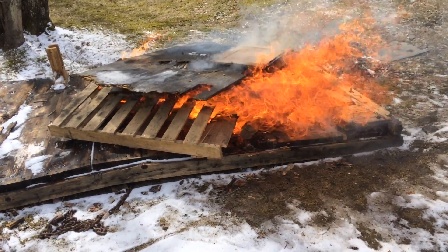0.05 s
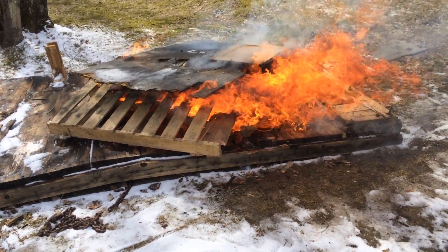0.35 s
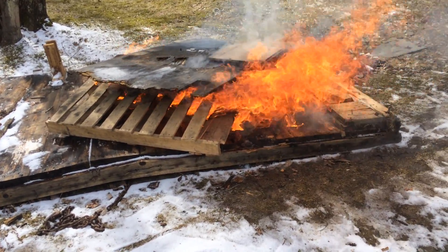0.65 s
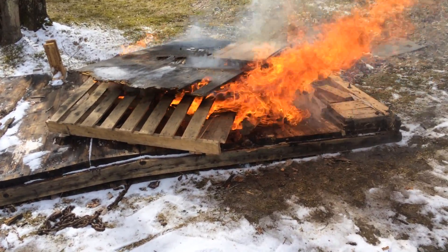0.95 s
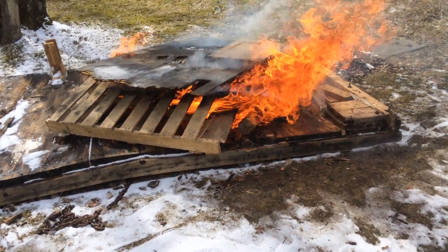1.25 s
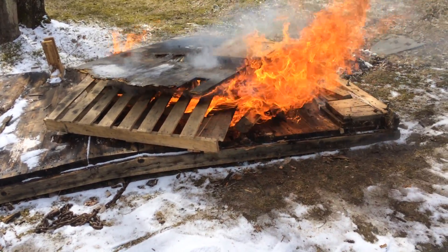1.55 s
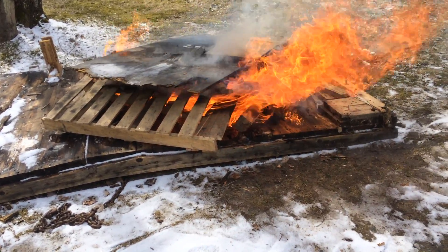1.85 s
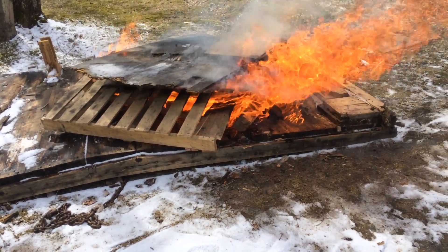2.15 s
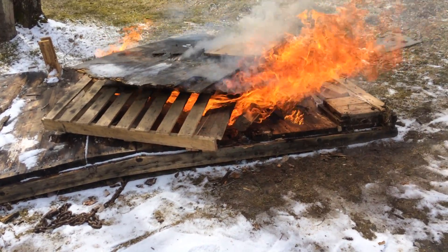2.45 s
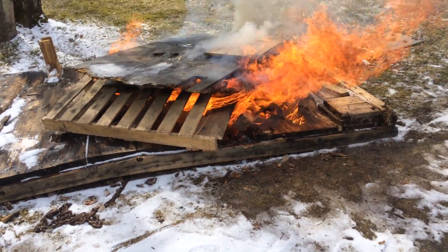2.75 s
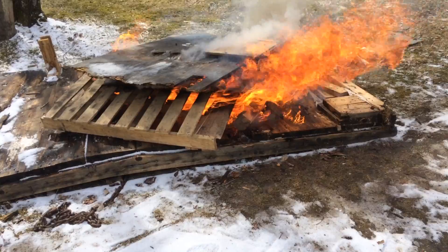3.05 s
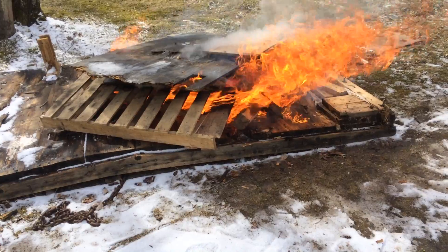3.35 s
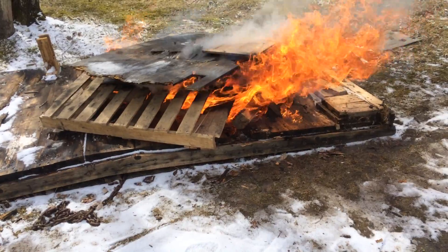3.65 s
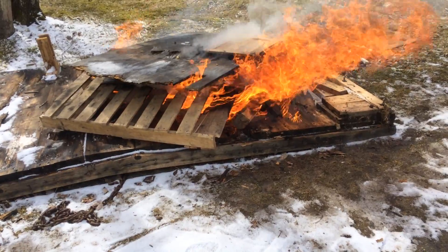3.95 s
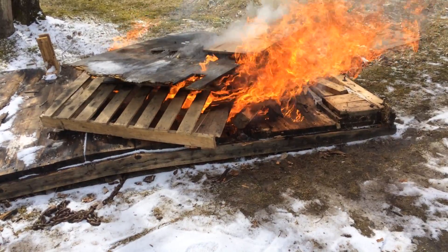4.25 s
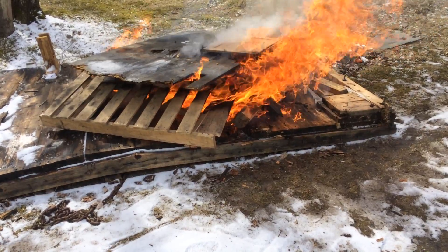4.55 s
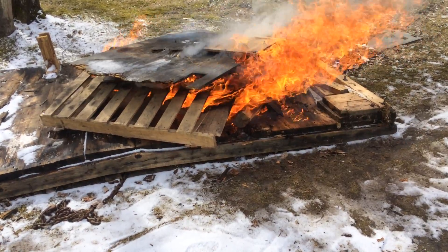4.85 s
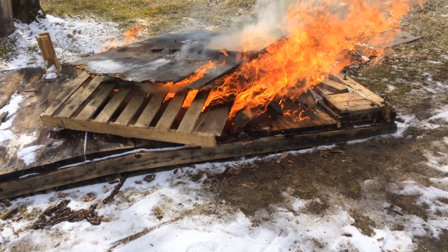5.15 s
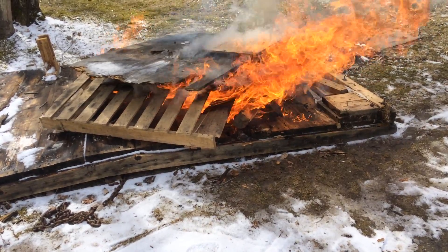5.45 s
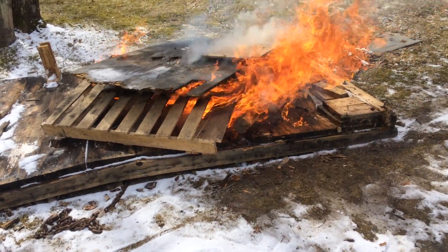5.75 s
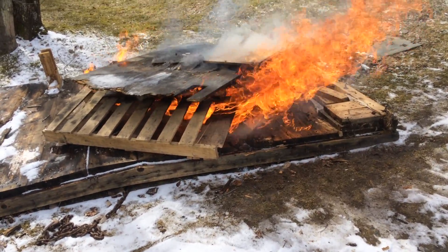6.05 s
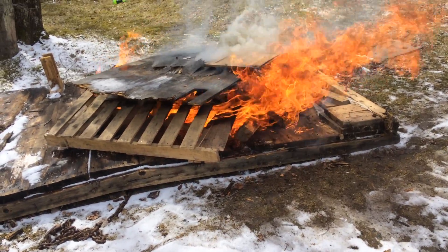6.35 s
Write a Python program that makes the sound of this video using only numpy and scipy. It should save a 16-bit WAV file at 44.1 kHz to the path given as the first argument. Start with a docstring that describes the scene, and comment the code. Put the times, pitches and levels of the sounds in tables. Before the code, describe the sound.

Dry wood crackles and pops throughout in a nearby open-air fire, some cracks loud and bright, others small and hollow, each dying away quickly. A faint, fluttering flame roar and a low rumble of wind on the microphone lie beneath, along with a thin hiss of boiling sap. A thumping pop stands out about a third of the way through, and a weaker one follows later as the crackling carries on.

```python
"""Flames flutter low in a light wind, and at once wood snaps: a pile of pallets and boards burns outdoors,
a few steps from a small microphone. Steam pockets split the wood in brittle fractures that scatter
among the boards and fade over the yard; a few burst with a thump. In between, embers tick,
boiling sap sizzles, and now and then a sheet of flame catches with a soft whump."""
import sys
import numpy as np
from scipy import signal
from scipy.fft import rfft, irfft, next_fast_len
from scipy.io import wavfile
from scipy.ndimage import map_coordinates

SR = 44100
rng = np.random.default_rng(int(sys.argv[2]) if len(sys.argv) > 2 else 0)


def unload_wav(signal):
    """Save mono or channel-first audio to the path in sys.argv[1] as 16-bit WAV at rate SR, clipped to [-1, 1]."""
    wavfile.write(
        sys.argv[1],
        SR,
        np.round(np.clip(np.atleast_2d(signal).T, -1, 1) * 32767).astype(np.int16),
    )


N = 282240
LEAD_S = .0042  # a snap starts this early, since fibres tear before the break

# wood splitting: (time [s], level [dB], woody body [dB], brightness [dB])
FRACTURES = [(0.0903, -18.5, -3, -1), (0.0936, -25, -10.5, 0), (0.1078, -22, -11, 16),
             (0.1581, -30.5, -7, 2), (0.178, -30, 1, 3), (0.305, -31.5, -5.5, -8.5), (0.327, -39.5, -15, 5),
             (0.3447, -30, -5, 9), (0.3987, -41, -6, -4), (0.6868, -30.5, -9.5, 1), (0.7206, -22.5, 0, 5.5),
             (0.729, -37, -20, -0.5), (0.8374, -24, -11, 4), (0.8468, -18, -8, -5),
             (0.9496, -28.5, -13, 3.5), (1.1872, -28, -12.5, 0.5), (1.2384, -28, -2, 2.5),
             (1.3369, -28.5, -10, 2), (1.3501, -24, -3.5, -1.5), (1.3922, -27.5, -7, -1.5),
             (1.5528, -36.5, -2, 1.5), (1.711, -40, -3.5, 1.5), (1.8382, -37.5, -6, 8),
             (1.8594, -35.5, -3, 0), (1.878, -34, -1, 1), (1.9899, -21, 1, 5), (2.1145, -35.5, -1, 1.5),
             (2.1382, -39, 0, 6), (2.1508, -31, -3, 2), (2.276, -42.5, -2, 4.5), (2.335, -38, -15, 5),
             (2.4032, -21, -11, -1), (2.4677, -25, -3, 1.5), (2.5167, -36.5, -7, 7.5),
             (2.6032, -39, -2, -8), (2.6431, -31, -1.5, -8), (2.683, -43, -15, 3.5),
             (2.7636, -36.5, -4, 4.5), (2.7881, -37, 1, -13), (2.8673, -25.5, 1, -0.5), (2.896, -28, 5, -9),
             (2.988, -25.5, -1, -11), (3.0085, -17, -3.5, 1), (3.0112, -21.5, -10, 7.5),
             (3.038, -33.5, -8, 3.5), (3.1782, -42.5, 4, 8), (3.206, -40, -7, 0),
             (3.2722, -24.5, -5.5, 0.5), (3.3308, -35, -7, 4.5), (3.42, -39, -10, 3.5),
             (3.5405, -23.5, -5, -3), (3.5678, -19, -1.5, -0.5), (3.5948, -23, 1.5, 0),
             (3.6145, -26, -2, 2.5), (3.6372, -26, -3, -2.5), (3.7329, -33, 3, 1),
             (3.7448, -22.5, 5.5, -2.5), (3.7871, -27, -14, 2), (3.7998, -27.5, 1.5, 4.5),
             (3.9014, -36.5, -3, -9.5), (3.9266, -25.5, -4.5, 1.5), (3.9718, -21, -4, 2),
             (4.0412, -39.5, -12, 10), (4.146, -32.5, -1.5, 3), (4.2175, -24.5, -10.5, 0.5),
             (4.2427, -22, -15, 1.5), (4.2819, -28.5, -7, 4), (4.3694, -29.5, 1.5, -5),
             (4.4293, -40, -7, -3), (4.4374, -34, 1, -2.5), (4.6881, -33.5, -5, 12), (4.821, -46, -9, 19),
             (4.8868, -39, -9, 3), (4.9041, -36.5, -2, -2), (4.9186, -37, -7, 3), (4.946, -31, 12.5, -6),
             (5.0667, -33.5, -3.5, 3), (5.08, -38, 1, -1.5), (5.123, -31, -10, -2), (5.135, -37.5, -3, 2.5),
             (5.167, -41, -7, -1.5), (5.378, -17, 0, 3.5), (5.4812, -31, -4, -4), (5.4849, -22, -6.5, -2),
             (5.5147, -22, -14, -2), (5.5225, -36, -3, 3), (5.5718, -25, -2, -2), (5.6172, -31, 4, -1),
             (5.6534, -37.5, -2, 4), (5.692, -43.5, -2, -5), (5.8366, -41.5, 0, 2), (5.857, -34, -0.5, -1),
             (5.8862, -25.5, -4, 13), (6.1309, -31, -2, -0.5), (6.1379, -21.5, -6.5, 2),
             (6.1904, -32.5, -11, 6), (6.2555, -26, 1.5, 1), (6.2703, -37, 0, 0.5),
             (6.337, -30.5, -3.5, -7.5), (6.3965, -22, -7, -5.5)]


def amp(db):
    return 10 ** (np.asarray(db) / 20)


def unit_rms(x):
    return x / np.sqrt(np.mean(x ** 2) + 1e-20)


def along(points, hz):
    """Interpolation of (frequency [Hz], value) points on a log axis."""
    f, v = np.transpose(points)
    return np.interp(np.log(hz + 1), np.log(f + 1), v)


def curve(points):
    """Linear interpolation of (time [s], value) points at every sample."""
    return np.interp(np.arange(N) / SR, *np.transpose(points))


def wobble(rate):
    """Smooth random modulation, rate knots a second."""
    return map_coordinates(rng.standard_normal(int(N * rate / SR) + 4), [np.arange(N) * rate / SR])


def filtered(x, response):
    """Zero-phase filtering by a gain that depends on frequency."""
    size = next_fast_len(N + SR // 2)
    return irfft(rfft(x, size) * response(np.fft.rfftfreq(size, 1 / SR)), size)[:N]


def shaped(x, spectrum):
    """Spectral shaping of a noise, at unit RMS."""
    return unit_rms(filtered(x, lambda hz: amp(along(spectrum, hz))))


def coloured(x, colour_db):
    """Minimum-phase filtering: causal, so an attack stays sharp."""
    size = 2 * next_fast_len(len(x))
    cepstrum = irfft(np.log(amp(colour_db(np.fft.rfftfreq(size, 1 / SR)))))
    cepstrum[1:size // 2] *= 2
    cepstrum[size // 2 + 1:] = 0
    return irfft(rfft(x, size) * np.exp(rfft(cepstrum)))[:len(x)]


def add(track, s, sound):
    """Superposition of a sound on the track from time s on."""
    start = int(np.clip(round(s * SR), 0, N))
    track[start:start + len(sound)] += sound[:N - start]


def wind():
    """Eddies buffet the microphone with low-frequency pressure fluctuations."""
    # strength of the buffeting: (time [s], level [dB])
    gusts = [(0.0, -48.5), (0.24, -59.5), (0.32, -50), (0.56, -52), (0.64, -63), (1.04, -45), (1.12, -51.5),
             (2.08, -56), (2.88, -49), (3.36, -58), (4.24, -56), (4.48, -46.5), (4.56, -56), (4.72, -48),
             (5.04, -64), (5.2, -50.5), (5.44, -60), (6.4, -55)]
    # its spectrum: (frequency [Hz], relative density [dB])
    buffet_spectrum = [(12, -31), (25, -25), (38, 5.5), (52, -0.5), (70, 6.5), (100, 0), (135, -7),
                       (220, -39)]
    return amp(curve(gusts) + 1.5 * wobble(12)) * shaped(rng.standard_normal(N), buffet_spectrum)


def flames(rush_db=-61):
    """Turbulent combustion radiates a low, fluttering roar; hot gas adds broadband flow noise."""
    # strength of the flames: (time [s], level [dB])
    blaze = [(0.0, -58.5), (0.88, -60), (1.12, -57), (2.64, -59), (2.72, -54), (3.12, -55.5), (3.2, -52),
             (4.0, -54), (4.16, -49.5), (4.56, -61), (4.72, -55), (4.8, -60.5), (4.96, -53), (5.36, -58.5),
             (6.16, -48.5), (6.4, -54.5)]
    # spectra of the roar and of the rushing gas: (frequency [Hz], relative density [dB])
    roar_spectrum = [(70, -30), (120, 3), (150, 1.5), (190, 0.5), (240, -5.5), (310, -11), (420, -17.5),
                     (700, -55)]
    rush_spectrum = [(180, -23), (300, -3), (520, -3), (1300, -4.5), (2100, -12), (3500, -14.5),
                     (7500, -10), (15000, -12)]
    roar_db = curve(blaze)
    flutter_db = 2 * wobble(25)
    flicker_db = .8 * wobble(9) + .2 * (roar_db - roar_db.mean())
    roar = amp(roar_db + flutter_db) * shaped(rng.standard_normal(N), roar_spectrum)
    rush = amp(rush_db + flicker_db) * shaped(rng.standard_normal(N), rush_spectrum)
    return roar + rush


def sizzle(level_db=-63.5, spits_per_s=450, life_s=.0008, spread_db=3.5):
    """Shot noise: sap boils out of the grain in tiny, independent spits."""
    # boiling sap: (frequency [Hz], relative density [dB])
    sap_spectrum = [(500, -30), (1500, -15), (4000, -1), (9000, -28), (15000, -1)]
    onsets = rng.random(N) < spits_per_s / SR
    spits = onsets * amp(spread_db * np.minimum(rng.exponential(size=N), 4))
    power = signal.lfilter([1], [1, -np.exp(-2 / (life_s * SR))], spits ** 2)
    return amp(level_db) * shaped(np.sqrt(power) * rng.standard_normal(N), sap_spectrum)


def fracture(body_db, bright_db, ring_hz, length_ms,
             tear_db=-12, scatter_db=-10, pile_db=-34, ring_db=3, shock=1.34):
    """Brittle fracture, 4 ms in: fibres tear, the wood gives way, the boards around scatter the crack."""
    # colour of breaking wood: (frequency [Hz], gain [dB])
    wood_colour = [(60, -30), (300, -17), (550, -7), (1000, 0), (1500, 1.5), (2000, -1), (3000, 0),
                   (5000, 1), (10000, .5), (15000, -1), (17000, -20)]
    ms = np.arange(-4 * SR // 1000, SR // 16) * 1000 / SR
    after, before = np.maximum(ms, 0), np.minimum(ms, 0)
    life_ms = max(.7 * (length_ms - .3), .15)
    split = np.exp(before / (.26 * life_ms) - after / life_ms)
    tear = amp(tear_db) * np.exp(before / (life_ms + .4)) * (ms < 0)
    near = amp(scatter_db) * np.sqrt(life_ms) * np.exp(-after / 3.5)
    scatter = np.hypot(near, amp(pile_db) * np.exp(-after / 25)) * (ms > 0)
    # fibres give way one after another
    ragged = amp(3.5 * np.interp(ms, np.arange(-4, 66, .5), rng.standard_normal(140)))
    direct = rng.standard_normal(len(ms)) * ragged * np.sqrt(split ** 2 + tear ** 2 + scatter ** 2)
    direct[np.argmax(ms >= 0)] += shock  # the shock front of the break
    # comb filtering: reflections from two nearby boards give a hollow colour
    pressure = direct.copy()
    for lag_ms, strength in rng.uniform((.15, -.35), (1.4, .35), (2, 2)):
        lag = int(lag_ms * SR / 1000)
        pressure[lag:] += strength * direct[:-lag]
    tilt = [(450, .6 * body_db - 3), (1050, body_db - 1), (1400, body_db),
            (3200, 0), (5500, 0), (10500, bright_db)]  # (frequency [Hz], gain [dB])
    splinter = lambda hz: ring_db / (1 + (np.log((hz + 1) / ring_hz) / .18) ** 2)
    sound = coloured(pressure, lambda hz: along(wood_colour, hz) + along(tilt, hz) + splinter(hz))
    attack = (ms > -2.5) & (ms < 4.5)
    return sound / np.sqrt(np.mean(sound[attack] ** 2))


def ticks(count=350, faint_db=-62, spread_db=4.5, loudest_db=-48, flurry_db=5):
    """Small fractures in the embers come in flurries and obey a power law: many faint, few clear."""
    track = np.zeros(N)
    activity = np.cumsum(amp(flurry_db * wobble(14)))
    for when, size, body, bright, ring, length in rng.random((count, 6)):
        db = min(faint_db - spread_db * np.log(size), loudest_db)
        tick = fracture(body_db=-8 + 12 * body, bright_db=-4 + 14 * bright,
                        ring_hz=2500 * 5 ** ring, length_ms=.5 + 1.5 * length)
        add(track, np.searchsorted(activity, when * activity[-1]) / SR, amp(db) * tick)
    return track


def snap(level_db, body_db, bright_db):
    """Resonance rises as size falls: a thinner splinter is brighter and rings higher."""
    ring_hz = min(7600 * 2 ** (bright_db / 9), 12500)
    # a violent fracture is over sooner, a thick board takes longer
    length_ms = 1.15 - .012 * (level_db + 25) + .02 * body_db
    return amp(level_db) * fracture(body_db, bright_db, ring_hz, length_ms)


def snaps():
    """Steam pressure splits the wood, and each splinter radiates a sharp impulse."""
    track = np.zeros(N)
    for s, db, body_db, bright_db in FRACTURES:
        add(track, s - LEAD_S, snap(db, body_db, bright_db))
    return track


def aftercracks(count=2, mean_wait_s=.028, drop_db=24, spread_db=5):
    """Stress transfer: each snap loads the wood beside it, which gives way in weaker cracks."""
    track = np.zeros(N)
    for s, db, *_ in np.repeat(FRACTURES, count, axis=0):
        wait = rng.gamma(2, mean_wait_s / 2)
        size, body, bright = rng.standard_normal(3)
        crack = snap(db - drop_db + spread_db * size, body_db=-2 + 3 * body, bright_db=2 + 4 * bright)
        add(track, s + wait - LEAD_S, crack)
    return track


def yard(x, spots=5):
    """Reverberation: ground and trees return a diffuse tail, different for each spot in the fire."""
    # decay over the yard: (frequency [Hz], time to fall 60 dB [s])
    decay_times = [(500, 0.3), (2000, 0.18), (7000, 0.18), (15000, 0.25)]
    wet = np.zeros(N)
    spot = np.arange(N) // (SR // 20) % spots  # the spots take turns every 50 ms
    for k in range(spots):
        hz, t, noise = signal.stft(rng.standard_normal(SR // 3), SR, nperseg=256)
        decay = amp(-60 * t / along(decay_times, hz)[:, None])
        tail = signal.istft(noise * decay, SR, nperseg=256)[1]
        tail *= 1 - np.exp(-np.arange(len(tail)) / SR / .0009)
        wet += signal.fftconvolve(x * (spot == k), tail / np.linalg.norm(tail))[:N]
    return wet


def flaps():
    """Thermal expansion: a sheet of flame catches with a soft whump, lower for a large one."""
    # tongues of flame: (time [s], level [dB], decay time [s], pitch [ratio])
    tongues = [(0.4, -37, 0.035, 1.0), (1.025, -43, .028, .5), (4.685, -45, .03, .5),
               (6.165, -43, .025, .75)]
    # colour of a whump at pitch 1: (frequency [Hz], gain [dB])
    whump_colour = [(60, 0), (110, 8), (210, 7), (290, -7.5), (400, -7.5), (520, -35), (900, -34),
                    (4000, -50)]
    track, t = np.zeros(N), np.arange(SR // 6) / SR
    for s, db, life, pitch in tongues:
        gas = unit_rms(coloured(rng.standard_normal(len(t)), lambda hz: along(whump_colour, hz / pitch)))
        add(track, s, amp(db) * gas * np.exp(-t / life))
    return track


def bursts():
    """Impulse excitation: escaping gas gives one low push, cracks the wood and rings the hollow pile."""
    # gas pockets: (time [s], push level [dB], push frequency [Hz], push decay time [s], knock level [dB])
    pockets = [(1.964, -19.5, 207, 0.0073, -22), (1.9886, -15, 86.5, 0.0041, -26.5),
               (4.9265, -35, 147, 0.016, -37.5), (4.945, -33.5, 192, .012, -39)]
    # damped modes of the pile: (frequency [Hz], relative level [dB], decay time [s])
    pile_modes = [(303, 5, 0.001), (525, 0.5, 0.0023), (670, -1, 0.0032), (1025, -2.5, 0.0029),
                  (1430, 1.5, 0.0026), (1790, 0, .0018), (2450, -7, 0.0016)]
    track, t = np.zeros(N), np.arange(SR // 10) / SR
    for s, push_db, push_hz, push_life, knock_db in pockets:
        push = -np.sin(2 * np.pi * push_hz * t) * np.exp(-t / push_life)
        knock = np.zeros(len(t))
        for k, (hz, db, life) in enumerate(pile_modes):
            strength = (-1) ** (k + 1) * amp(db + rng.normal(0, 1.5))
            knock += strength * np.sin(2 * np.pi * hz * t) * np.exp(-t / life)
        add(track, s, amp(push_db) * push + amp(knock_db) * knock)
        crack = fracture(body_db=0, bright_db=-3, ring_hz=3500, length_ms=2)
        add(track, s - LEAD_S, amp(knock_db - 6) * crack)
    return track


def scene():
    """The sources add by superposition; only the crackle reverberates."""
    crackle = snaps() + aftercracks() + ticks() + bursts()
    return (crackle + amp(-21) * yard(crackle) + sizzle() + wind() + flames() + flaps())[None]


def record(dry, bass_hz=42, ceiling=.8, top_hz=15350):
    """Band limiting and soft saturation: the microphone sheds deep bass and top treble and rounds peaks."""
    lean = signal.sosfilt(signal.butter(3, bass_hz, "highpass", fs=SR, output="sos"), dry[0])
    rounded = lean / (1 + (lean / ceiling) ** 4) ** (1 / 4)
    return filtered(rounded, lambda hz: 1 / np.sqrt(1 + (hz / top_hz) ** 160))[None]


dry = scene()
out = record(dry)
unload_wav(out)
```